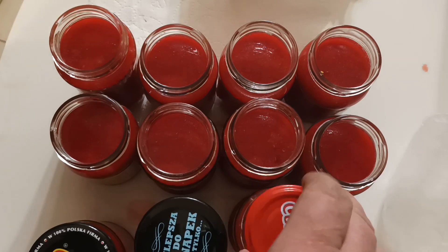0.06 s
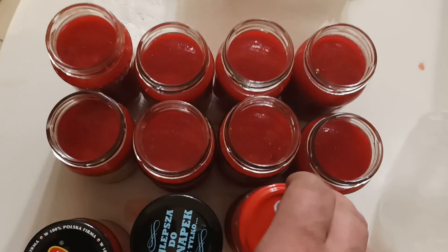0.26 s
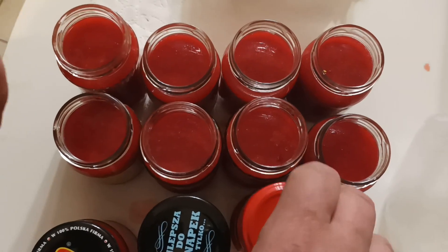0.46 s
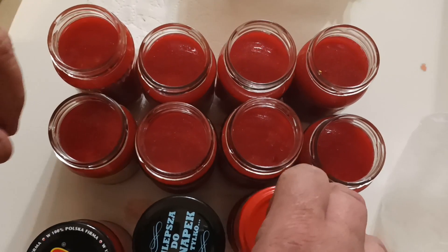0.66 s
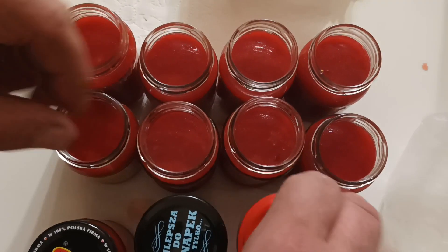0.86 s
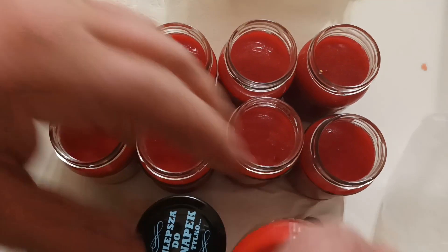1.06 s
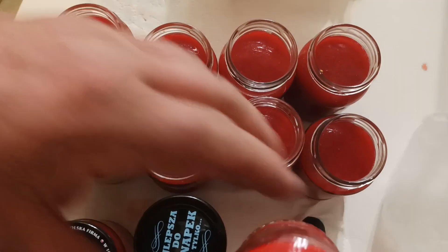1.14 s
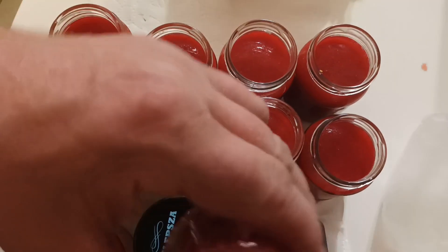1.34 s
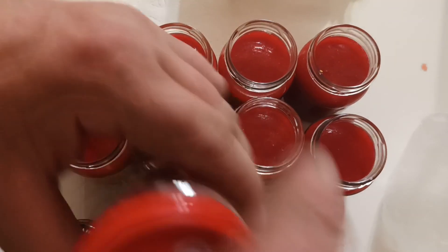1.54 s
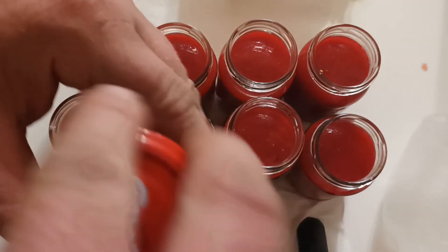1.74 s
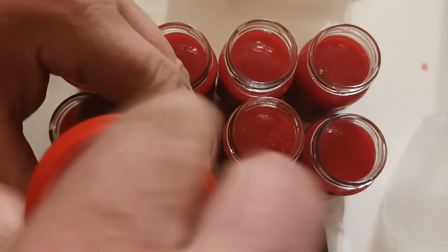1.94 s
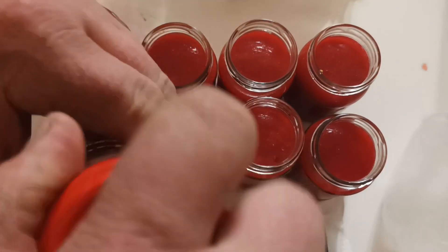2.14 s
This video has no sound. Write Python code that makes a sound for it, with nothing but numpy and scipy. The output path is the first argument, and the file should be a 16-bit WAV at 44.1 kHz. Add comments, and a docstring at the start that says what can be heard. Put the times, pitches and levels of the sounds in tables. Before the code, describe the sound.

A metal lid knocks hollowly on a small glass jar with a sharp clink, soft bumps and finger brushes follow, then clustered knocks and gritty thread scraping, close in stereo in a small kitchen.

```python
"""Glass jars and a metal lid

Small glass jars on a kitchen counter, close by. Jars clink (crack, ringing modes, diffuse shimmer) and a
metal lid knocks hollowly on a rim (short swelling sines with edge ticks), then twists on the thread (random slips).
Damped low bumps, grainy finger brushes, swishes and a rub lie around it; two brighter clacks sound further
off. Noise shaped band by band makes the small room, over a coloured noise floor."""
import sys
import numpy as np
from scipy import signal
from scipy.fft import rfft, irfft
from scipy.io import wavfile
from scipy.ndimage import map_coordinates

SR = 44100
rng = np.random.default_rng(int(sys.argv[2]) if len(sys.argv) > 2 else 0)


def wav_record(signal):
    """Record a signal, one row per channel, as 16-bit PCM in the file named by sys.argv[1]."""
    frames = np.transpose(np.atleast_2d(signal))
    bounded = np.clip(frames, -1, 1)
    # unit amplitude maps onto the largest positive 16-bit level
    quanta = np.round(bounded * 32767).astype(np.int16)
    wavfile.write(sys.argv[1], SR, quanta)


N = 97020


def undb(db):
    """Decibels to amplitude gain."""
    return 10 ** (np.asarray(db) / 20)


def unit(x):
    """Scale to rms 1."""
    return x / np.sqrt(np.mean(x ** 2))


def curve(rows, t, axis=1):
    """One column of a time table, joined by straight lines."""
    rows = np.array(rows)
    return np.interp(t, rows[:, 0], rows[:, axis])


def over_hz(rows, hz, axis=1):
    """One column of a frequency table, interpolated over log frequency."""
    rows = np.array(rows)
    return np.interp(np.log(np.maximum(hz, 1)), np.log(rows[:, 0]), rows[:, axis])


def colour(x, points):
    """Minimum-phase filter with the given spectrum, scaled to unit power gain."""
    gain = unit(undb(over_hz(points, np.linspace(0, SR / 2, N + 1))))
    # fold the cepstrum onto positive time: causal response
    cepstrum = irfft(np.log(gain))
    cepstrum[1:N] *= 2
    cepstrum[N + 1:] = 0
    response = np.exp(rfft(cepstrum))
    return irfft(rfft(x, 2 * N) * response)[..., :N]


def fade(t60):
    """Exponential decay from 1, -60 dB at t60."""
    return np.exp(-np.log(1000) * np.minimum(np.arange(N) / SR / t60, 10))


def burst(t60):
    """White noise that decays exponentially."""
    return rng.standard_normal(N) * fade(t60)


def burst_pair(t60):
    """Two independent bursts."""
    return np.array([burst(t60), burst(t60)])


def add(out, start, sound):
    """Mix a sound in at a start time in seconds."""
    i = max(int(start * SR), 0)
    size = min(sound.shape[-1], N - i)
    out[..., i:i + size] += sound[..., :size]


def pan(db):
    """Left and right gains from left minus right in dB."""
    return undb(np.array([[.5], [-.5]]) * db)


def ring(modes, tilt_db=0):
    """Sum of decaying sine modes, tilted in dB per octave about 3 kHz."""
    t = np.arange(N) / SR
    total = np.zeros(N)
    for hz, db, t60 in modes:
        gain = undb(db + tilt_db * np.log2(hz / 3000))
        total += gain * fade(t60) * np.sin(2 * np.pi * hz * t)
    return total


def slips(per_s, spread_db):
    """Stick-slip impulses at random times, of uneven size."""
    fires = rng.random(N) < per_s / SR
    return fires * undb(spread_db * np.clip(rng.standard_normal(N), -2, 2))


def grains(per_s):
    """Rough contact: random impulses of either sign, scaled to rms 1."""
    return unit((rng.random(N) < per_s / SR) * rng.standard_normal(N))


def apart(x):
    """Antiphase left-right difference of a diffuse sound, reduced in the bass."""
    shared_below_hz = 550
    high_pass = signal.butter(1, shared_below_hz, "high", fs=SR, output="sos")
    return signal.sosfilt(high_pass, x) * np.array([[1], [-1]])


def wide_noise(pair, points, side, pan_db):
    """Coloured noise, partly different left and right."""
    mid, difference = colour(pair, points)
    return (mid + side * difference * np.array([[1], [-1]])) * pan(pan_db)


def hollow(hz):
    """The lid over the jar's air: a few sine cycles that swell and die."""
    rise_s, sharpness = 0.0015, 2.22
    t = np.arange(N // 100) / SR
    age = t / rise_s
    return (age * np.exp(1 - age)) ** sharpness * np.sin(2 * np.pi * hz * t)


def shaken():
    """Many jars of almost the same pitch: 12 close sines beat in a faint, wavering ring."""
    centre_hz, spread_hz, t60_s, level_db = 2988, 130, 0.21, -28.5
    hz = centre_hz + spread_hz * rng.standard_normal(size=(12, 1))
    phase_cycles = rng.random(hz.shape)
    partials = np.sin(2 * np.pi * (hz * np.arange(N) / SR + phase_cycles))
    return undb(level_db) * unit(partials.sum(axis=0)) * fade(t60_s)


def lid():
    """Each knock is a hollow pock, an edge tick, a faint modal ring and jars shaken along."""
    # lid hits on the rim [t/s, level/dB, f/Hz, edge tick re knock/dB]
    knocks = [(0.0416, -29, 1340, 4), (0.0973, -38, 1260, -33), (0.1703, -39, 1520, -24),
              (0.191, -30, 1140, -43), (0.2138, -19, 1185, -33), (0.2188, -17.5, 1100, -40),
              (0.2293, -14, 1333, -20), (0.2353, -20.5, 1350, -28), (.2408, -19.5, 980, -22),
              (0.3369, -14.5, 1195, -32), (0.4464, -17, 1032, -25), (0.5022, -40, 1200, -30),
              (0.737, -46.5, 1170, -14), (1.1931, -42.5, 1000, -14), (1.2582, -32.5, 974, -24.5),
              (1.297, -55.5, 1100, 10), (1.414, -42, 1000, -25), (1.4861, -26, 1146, -24),
              (1.4925, -34.5, 1080, -25), (1.4969, -40, 1000, -11), (1.6373, -21.5, 1100, -34),
              (1.6502, -20.5, 1148, -17), (1.6991, -25.5, 1080, -35), (1.705, -20, 1000, -39),
              (1.718, -17, 1145, -38), (1.7251, -11.5, 975, -14), (1.737, -18, 993, -17),
              (1.7438, -20.5, 980, -41), (1.7735, -28.5, 940, -35), (1.789, -25.5, 960, -28),
              (1.8888, -24, 1040, -43), (1.8951, -18.5, 980, -43), (1.9007, -26, 918, -43),
              (1.9062, -24, 870, -28), (1.9101, -17, 973, -25.5), (1.917, -27, 996, -20),
              (1.9303, -17, 1163, -21.5), (1.9347, -19, 965, -28), (1.9393, -28.5, 1170, -10),
              (1.963, -55, 1120, -22)]
    # after-ring of the lid [f/Hz, level re knock/dB, t60/s]
    lid_modes = [(867, -33.5, 0.76), (996, -27, 0.14), (1236, -26.5, 0.19), (3040, -45, 0.24)]
    # spectrum of the metal edge [f/Hz, level/dB]
    tick_spectrum = [(150, -17.5), (500, -4), (1500, 8), (3000, -3.5), (4200, -6), (6300, 4), (8500, -40.5),
                     (11000, -13), (16000, -29)]
    tick_t60_s = 0.012
    pocks, ticks, blows, shakes = np.zeros((4, N))
    neighbours = shaken()
    for start, db, hz, tick_db in knocks:
        add(pocks, start, undb(db) * hollow(hz))
        add(ticks, start, undb(db + tick_db) * burst(tick_t60_s))
        add(shakes, start, undb(db + tick_db) * neighbours)
        add(blows, start, undb([db]))
    after_ring = signal.fftconvolve(blows, ring(lid_modes))[:N]
    return pocks + shakes + colour(ticks, tick_spectrum) + after_ring


def thread():
    """The turning lid chatters and grinds on the glass thread; each slip has its own pitch."""
    # lugs sliding on the thread [t/s, chatter level/dB, gritty treble level/dB]
    twist = [(1.40, -66, -83), (1.49, -46.5, -53), (1.54, -101, -93), (1.61, -58.5, -97), (1.69, -38, -73),
             (1.725, -50, -39), (1.75, -67, -57), (1.785, -37.5, -73), (1.85, -71, -86), (1.88, -45.5, -86),
             (1.91, -32.5, -62), (1.938, -23, -43.5), (1.955, -65, -58.5), (2.05, -75, -56.5),
             (2.2, -62, -52.5)]
    # spectrum of the grinding [f/Hz, level/dB]
    grit_spectrum = [(300, -2), (1500, 10), (2700, 0), (4200, -5.5), (6100, -1.5), (8500, -5.5),
                     (11000, -6.5), (16000, -42)]
    chatter_per_s, chatter_hz, grit_per_s = 420, 1000, 2900
    t = np.arange(N) / SR
    sizes = slips(chatter_per_s, spread_db=4.5)
    pitches_hz = chatter_hz * 2 ** rng.uniform(-.15, .25, N)
    chatter = np.zeros(N)
    for i in np.flatnonzero(sizes):
        add(chatter, t[i], sizes[i] * hollow(pitches_hz[i]))
    grit = unit(colour(slips(grit_per_s, spread_db=1), grit_spectrum))
    chatter = unit(chatter) * undb(curve(twist, t))
    grit = grit * undb(curve(twist, t, axis=2))
    return (chatter + grit) * (t > twist[0][0])


def jars():
    """Glass meets glass: a noise crack, the jar's modes and a dense shimmer among the other jars."""
    # glass on glass [t/s, level/dB, ring tilt/(dB/octave), crack re ring/dB]
    clinks = [(0.0408, -40, 6, 9), (0.212, -23.5, -0.5, 5.5), (0.226, -33.5, 1, -11), (0.233, -36, -3, -11)]
    # modes of the jar [f/Hz, level/dB, t60/s]
    jar_modes = [(950, 1.5, 0.099), (1010, -17, 0.42), (1375, 7, 0.045), (1532, -9, 0.18),
                 (1592, -19, 0.28), (1830, -19, 0.32), (2980, -11, 0.068), (3218, -28.5, 0.22),
                 (4615, -15.5, 0.079), (4660, -18.5, .13), (5430, -8.5, 0.093), (5390, -11.5, 0.13),
                 (5846, -23, .14), (6590, -22.5, 0.12), (7415, -19.5, 0.079), (11160, -10, 0.044)]
    # spectrum of the contact crack [f/Hz, level/dB]
    crack_spectrum = [(70, -23), (150, 8), (300, -21), (700, 11.5), (1500, 10), (2200, -9), (3200, 8.5),
                      (4000, -26), (6800, -13), (8300, -19), (11000, -6), (12500, -63), (16000, -43)]
    # spectrum of the shimmer [f/Hz, level/dB]
    scatter_spectrum = [(90, -16), (300, 1.5), (1400, 12), (2200, -1.5), (3100, -0.5), (4000, -9),
                        (6700, -5), (8200, -13.5), (9300, -7.5), (11300, -9), (12500, -20), (16000, -36)]
    crack_t60_s, scatter_t60_s, scatter_db, scatter_side = 0.02, 0.32, -11, 0.71
    rings, cracks = np.zeros((2, N))
    scatter = np.zeros((2, N))
    for start, db, tilt_db, crack_db in clinks:
        add(rings, start, undb(db) * ring(jar_modes, tilt_db))
        add(cracks, start, undb(db + crack_db) * burst(crack_t60_s))
        add(scatter, start, undb(db + scatter_db) * burst_pair(scatter_t60_s))
    mid, side = colour(scatter, scatter_spectrum)
    return rings + colour(cracks, crack_spectrum) + mid + scatter_side * apart(side)


def counter():
    """Dull, quickly damped bumps with a short papery edge; they set jars ringing."""
    # soft bumps on the counter [t/s, level/dB, f/Hz, edge re bump/dB]
    thuds = [(0.0398, -41, 314, -22), (0.172, -40.5, 315, -0.5), (0.541, -33.5, 142, -5),
             (.593, -33.5, 138, -13.5), (.606, -36.5, 170, -13), (.612, -37, 206, -12),
             (1.105, -44, 243, -1.5), (1.695, -35.5, 292, -7), (1.728, -44.5, 327, -21),
             (1.935, -36, 224, 3)]
    # spectrum of the papery edge [f/Hz, level/dB]
    edge_spectrum = [(100, -17), (350, 3.5), (700, 15.5), (1500, 10), (2500, 12), (3800, -25), (12000, -47)]
    # spectrum of the lumpy body [f/Hz, level/dB]
    lump_spectrum = [(80, -16), (230, -3.5), (450, -5.5), (3000, -37), (16000, -77)]
    thud_t60_s, edge_t60_s, lump_t60_s, lump_db = 0.038, 0.027, 0.053, -7.5
    bumps, edges = np.zeros((2, N))
    for start, db, hz, edge_db in thuds:
        tone = ring([(hz, 0, thud_t60_s)])
        lump = undb(lump_db) * colour(grains(900) * fade(lump_t60_s), lump_spectrum)
        add(bumps, start, undb(db) * (tone + shaken() + lump))
        add(edges, start, undb(db + edge_db) * burst(edge_t60_s))
    return bumps + colour(edges, edge_spectrum)


def fingers():
    """Fingers brush over the lid: grainy slips that rise quickly and die away."""
    # brushes [t/s, level/dB, length/s]
    brushes = [(0.638, -52, 0.084), (0.792, -54.5, 0.03), (0.919, -62.5, 0.11), (1.102, -54, 0.089)]
    # spectrum of the skin on metal [f/Hz, level/dB]
    brush_spectrum = [(100, -23), (300, -3.5), (700, -2), (1100, 2), (1700, -16), (2700, -16),
                      (5000, -24.5), (16000, -33)]
    attack_s = 0.023
    t = np.arange(N) / SR
    touch = np.zeros(N)
    for start, db, length in brushes:
        touch += undb(db) * np.interp(t - start, [0, attack_s, length], [0, 1, 0])
    return touch * unit(colour(slips(1500, spread_db=2.0), brush_spectrum))


def slide():
    """Soft swish as the hand slides the jar: coloured noise that swells and fades."""
    # swish level [t/s, level/dB]
    swish = [(.54, -89.5), (.75, -62), (1.02, -84)]
    # spectrum of the swish [f/Hz, level/dB]
    swish_spectrum = [(3000, 3), (4800, -9.5), (8800, -7.5), (10700, 6), (15000, -28)]
    t = np.arange(N) / SR
    sliding = (t > swish[0][0]) * (t < swish[-1][0])
    return colour(rng.standard_normal(N), swish_spectrum) * undb(curve(swish, t)) * sliding


def clacks():
    """Clacks further off: a bright noise snap with a long diffuse tail."""
    # distant clacks [t/s, level/dB, left minus right/dB, snap re tail/dB, tail tilt/(dB/octave)]
    far_hits = [(1.3157, -43, -0.5, 5, 0.26), (2.1403, -39, 1, 14, 4.2)]
    # spectrum of the tail before tilt [f/Hz, level/dB]
    tail_spectrum = [(100, -10), (450, 4.5), (1000, -1.5), (2700, 1), (5000, -2), (9000, -6.5),
                     (12000, -10.5), (16000, -24)]
    # spectrum of the first snap [f/Hz, level/dB]
    snap_spectrum = [(500, -3), (3000, -35), (7000, -10.5), (11000, 6), (16000, -18)]
    tail_t60_s, snap_t60_s, snap_pan_db = 0.3, 0.012, 8.5
    tails, snaps = np.zeros((2, 2, N))
    for start, db, pan_db, snap_db, tilt_db in far_hits:
        tilted = [(hz, level + tilt_db * np.log2(hz)) for hz, level in tail_spectrum]
        add(tails, start, undb(db) * pan(pan_db) * colour(burst_pair(tail_t60_s), tilted))
        add(snaps, start, undb(db + snap_db) * pan(snap_pan_db) * burst(snap_t60_s))
    return tails + colour(snaps, snap_spectrum)


def rub():
    """Something rubs across the counter: coloured rough-contact grains."""
    # rub level [t/s, level/dB]
    rub_level = [(2.05, -44), (2.054, -47), (2.075, -48), (2.105, -46.5), (2.135, -49.5), (2.16, -41),
                 (2.2, -49.5)]
    # spectrum of the rub [f/Hz, level/dB]
    rub_spectrum = [(100, -26), (315, 2.5), (450, 3.5), (818, -4), (1100, -9), (3050, -3), (5190, -24.5),
                    (10200, -20), (16000, -37)]
    t = np.arange(N) / SR
    pair = np.array([grains(1500), grains(1500)])
    noise = wide_noise(pair, rub_spectrum, side=0.66, pan_db=0.0)
    return noise * undb(curve(rub_level, t)) * (t > rub_level[0][0])


def kitchen(x):
    """Noise impulse response: dense early reflections, then a tail with its own decay per band."""
    # room bands [f/Hz, reverberation level/dB, t60/s]
    room = [(99, -3, 0.27), (403, -6, 0.32), (1100, -9.5, 0.36), (2900, -4, 0.35), (6000, -11.5, 0.27),
            (14000, -11, 0.29)]
    early_db, early_t60_s, early_gap_s, tail_rise_s = -5.5, 0.067, 0.0013, 0.0087
    t, hz = np.arange(N) / SR, np.linspace(0, SR / 2, N // 2 + 1)
    noise, tail = rfft(rng.standard_normal((2, N))), 0
    for k, (_, db, t60) in enumerate(room):
        # crossfading band weight: 1 at its own frequency, 0 at the others
        band = over_hz([(row[0], j == k) for j, row in enumerate(room)], hz)
        shape = fade(t60) * (1 - np.exp(-(t / tail_rise_s) ** 2))
        tail = tail + undb(db) * irfft(noise * band, N) * shape / np.linalg.norm(shape)
    early = burst_pair(early_t60_s) * (t > early_gap_s)
    early = undb(early_db) * early / np.linalg.norm(early, axis=1, keepdims=True)
    mid, side = tail + early
    response = (mid + apart(side)) / np.sqrt(2)
    return signal.fftconvolve(x[None], response, axes=1)[:, :N]


def floor():
    """Steady background: wide coloured noise with slow level changes."""
    # spectrum of the background [f/Hz, level/dB]
    floor_spectrum = [(30, -5), (75, -0.5), (199, -6), (295, -9), (1810, -20.5), (2900, -21), (4780, -32.5),
                      (10200, -35), (16000, -46)]
    # slow swell [t/s, level/dB]
    swell = [(0, -2.5), (.15, 4), (.8, 5), (1.0, .5), (2.2, 4.5)]
    floor_db = -61  # before the swell
    noise = wide_noise(rng.standard_normal((2, N)), floor_spectrum, side=0.78, pan_db=1.5)
    return noise * undb(floor_db + curve(swell, np.arange(N) / SR))


def scene():
    """Close sounds placed by level and delay, with the room and its background."""
    # where the lid is [t/s, left minus right/dB, lead of the left channel/ms]
    place = [(.04, 8, 0.071), (.21, -3, 0.17), (.34, 1, .012), (.45, 3.5, 0.065), (1.26, 6, 0.21),
             (1.64, 11.5, 0.27), (1.73, 4.5, .28), (1.93, 7, 0.28)]
    glass_pan_db, counter_pan_db = -1, 5
    t = np.arange(N) / SR
    metal, glass = lid() + thread(), jars()
    handling = counter() + fingers() + slide()
    late = map_coordinates(metal, [(t - curve(place, t, axis=2) / 1000) * SR], mode="nearest")
    direct = np.array([metal, late]) * pan(curve(place, t))
    direct = direct + glass * pan(glass_pan_db) + handling * pan(counter_pan_db)
    reverberant = kitchen(metal + glass.mean(axis=0) + handling)
    return direct + reverberant + clacks() + rub() + floor()


def record(dry):
    """The right microphone has its own response, duller on top; both lose rumble and extreme treble."""
    # response of the right microphone [f/Hz, gain/dB]
    right_mic = [(100, -2), (5000, -1.5), (7500, 5), (10000, -10), (16000, -19)]
    low_cut_hz, top_hz = 114, 16300
    right_gain = undb(over_hz(right_mic, np.linspace(0, SR / 2, N + 1)))
    right = irfft(rfft(dry[1], 2 * N) * right_gain)[:N]
    rumble_cut = signal.butter(2, low_cut_hz, "high", fs=SR, output="sos")
    top_cut = signal.ellip(10, .2, 80, top_hz, fs=SR, output="sos")  # .2 dB ripple, 80 dB stopband
    return signal.sosfilt(top_cut, signal.sosfilt(rumble_cut, [dry[0], right]))


dry = scene()
out = record(dry)
wav_record(out)
```